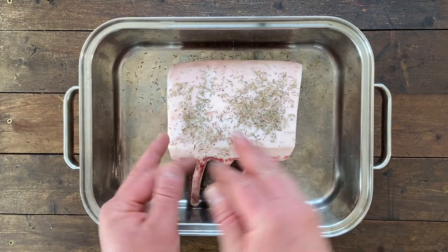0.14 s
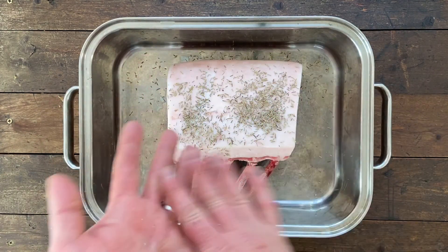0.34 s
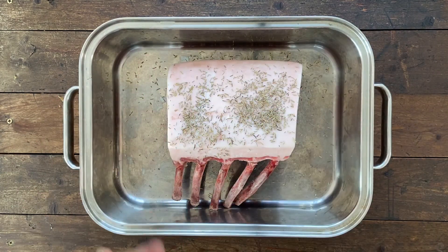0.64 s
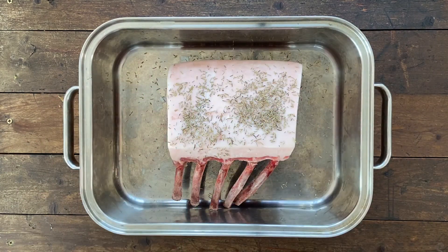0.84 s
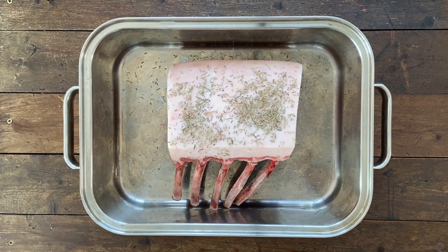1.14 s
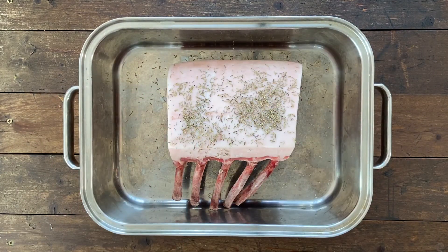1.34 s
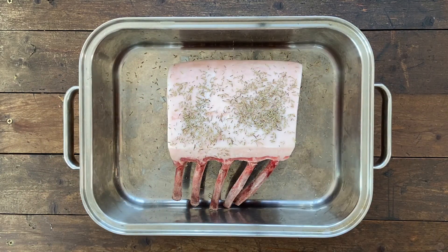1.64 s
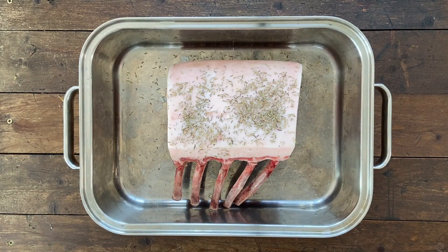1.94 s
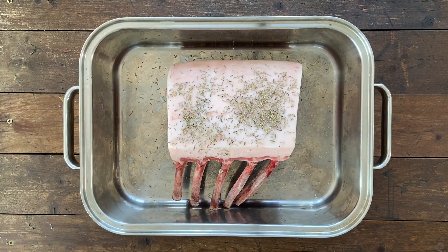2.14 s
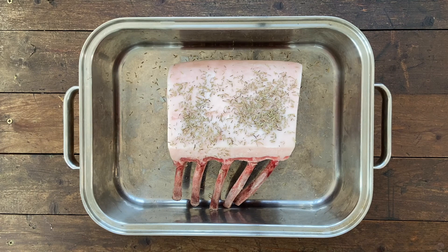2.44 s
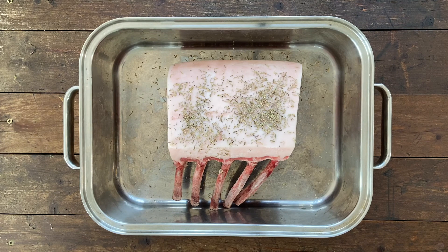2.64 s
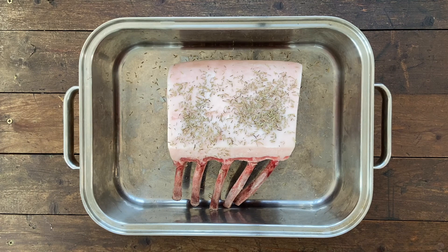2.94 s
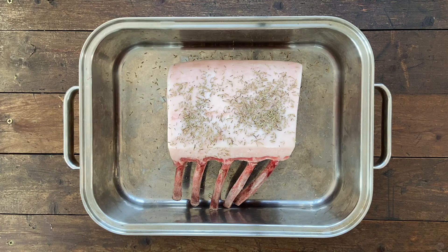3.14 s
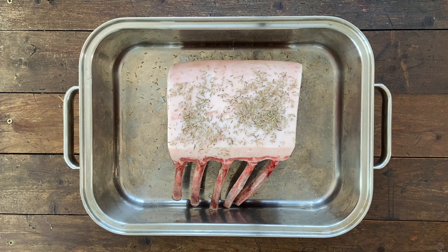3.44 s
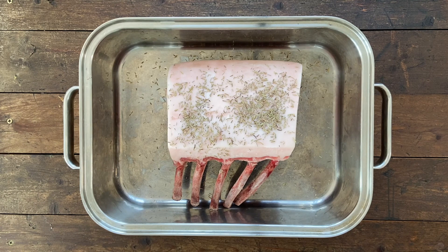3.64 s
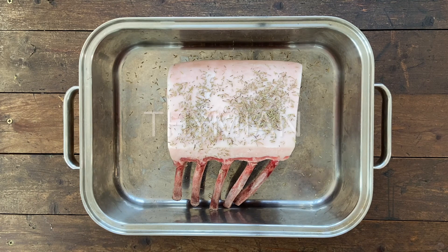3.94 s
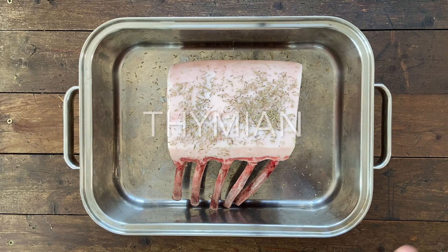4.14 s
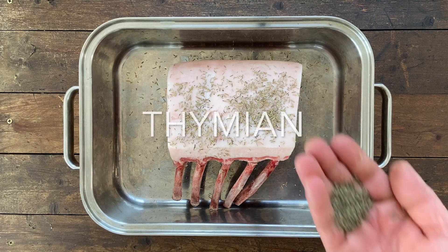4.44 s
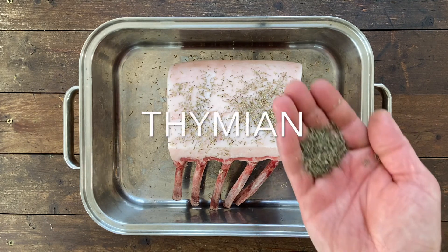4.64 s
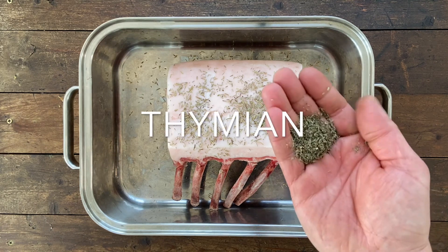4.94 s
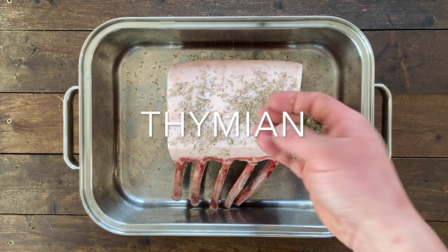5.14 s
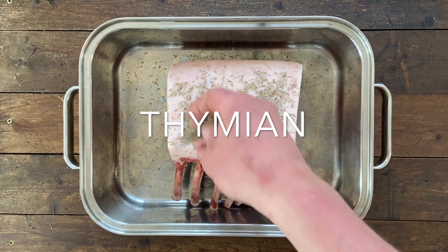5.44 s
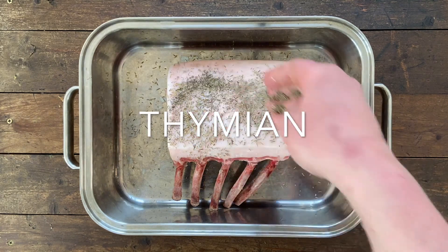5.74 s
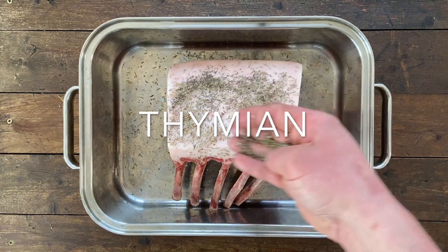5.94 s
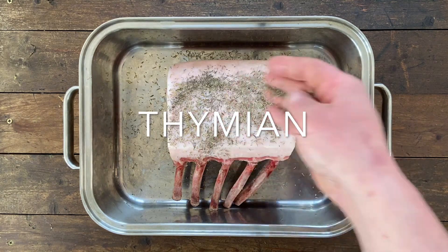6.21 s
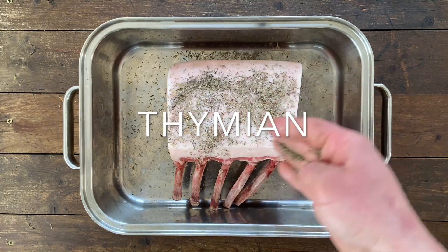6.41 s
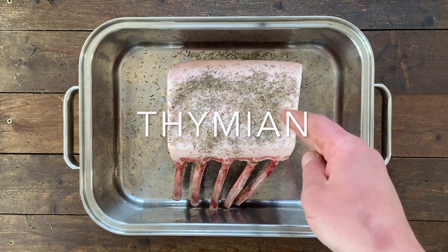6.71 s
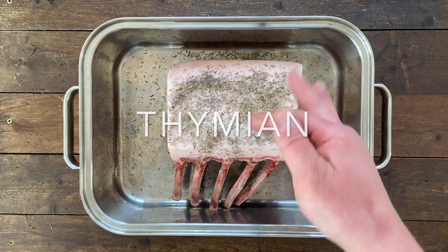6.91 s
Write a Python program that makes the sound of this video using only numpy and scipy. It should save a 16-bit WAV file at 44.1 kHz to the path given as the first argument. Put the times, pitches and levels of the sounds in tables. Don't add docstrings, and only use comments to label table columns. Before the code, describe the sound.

Dry herbs rustle between palms, a wooden drawer rolls and whines, a glass jar clinks down, its lid snaps, then more herbs are sprinkled.

```python
import sys
import numpy as np
from scipy import signal
from scipy.fft import rfft, irfft, next_fast_len
from scipy.io import wavfile
from scipy.ndimage import uniform_filter1d

SR = 44100
rng = np.random.default_rng(int(sys.argv[2]) if len(sys.argv) > 2 else 0)


def level_to_linear(level):
    exponent = np.asarray(level, float) / 20
    return 10 ** exponent


def generate_wav(signal):
    frames = np.transpose(np.atleast_2d(signal))
    scaled = np.clip(frames, -1, 1) * 32767
    pcm = np.round(scaled).astype(np.int16)
    wavfile.write(sys.argv[1], SR, pcm)


N = 311787
SIZE = next_fast_len(N + SR)
HZ = np.linspace(0, 1, SIZE // 2 + 1) * SR / 2
TIME = np.arange(N) / SR


def on_hz(table):
    hz, value = np.transpose(table)
    return np.interp(np.log(HZ + 1), np.log(hz + 1), value)


def shape(x, gain):
    return irfft(rfft(x, SIZE) * gain, SIZE)[..., :N]


def unit(x):
    return x / np.sqrt(np.mean(x ** 2))


def bell(hz, octaves):
    return np.exp(-.5 * (np.log2((HZ + 1) / hz) / octaves) ** 2)


def walk(rate_hz):
    hold = int(SR / rate_hz)
    steps = np.repeat(rng.standard_normal(N // hold + 1), hold)
    smooth = uniform_filter1d(uniform_filter1d(steps, hold), hold)
    return unit(smooth[:N])


def grit(share, spread_db):
    size_db = spread_db * np.minimum(rng.exponential(size=N), 3)
    clicks = (rng.random(N) < share) * level_to_linear(size_db)
    return unit(rng.standard_normal(N) * (1 + clicks))


def strokes(rows, rise_db_s, fall_db_s, tail_db, tail_db_s):
    power = np.zeros((2, N))
    for start_s, length_s, db, colour_db in rows:
        at = slice(max(int((start_s - .2) * SR), 0), int((start_s + length_s + 1) * SR))
        before = (start_s - TIME[at]).clip(0)
        after = (TIME[at] - start_s - length_s).clip(0)
        fall = level_to_linear(-2 * fall_db_s * after) + level_to_linear(2 * (tail_db - tail_db_s * after))
        stroke = level_to_linear(2 * (db - rise_db_s * before)) * fall
        power[:, at] += stroke * np.array([[1], [level_to_linear(2 * colour_db)]])
    return np.sqrt(power)


def strikes(times, db):
    x = np.zeros(N)
    x[(np.asarray(times) * SR).astype(int)] = level_to_linear(np.asarray(db))
    return x


def struck(blows, body):
    return shape(blows, rfft(body, SIZE))


def ring(modes, shorten):
    t, total = TIME[:SR], 0
    for k, (hz, db, t60_s) in enumerate(modes):
        fade = 1000. ** (-t / (shorten * t60_s))
        total = total + (-1) ** k * level_to_linear(db) * np.sin(2 * np.pi * hz * t) * fade
    return total


def crack(times, db, colour, fade_s):
    gain = level_to_linear(on_hz(colour))
    puffs = signal.lfilter([1], [1, -np.exp(-1 / (fade_s * SR))], strikes(times, db))
    return shape(puffs * rng.standard_normal(N), gain / np.sqrt(np.mean(gain ** 2)))


def dull_rings(rows):
    out, t = np.zeros(N), TIME[:SR // 8]
    contact_cycles = 0.55
    for start_s, db, hz, cycles in rows:
        start = int(start_s * SR)
        fade = np.exp(-2 * hz * t / cycles) * (1 - np.exp(-hz * t / contact_cycles))
        out[start:start + len(t)] += level_to_linear(db) * np.sin(2 * np.pi * hz * t) * fade
    return out


# f/Hz, level/dB per Hz
LEAF_COLOUR = [(400, -28.5), (800, -18.5), (2000, -3), (4500, -3), (7000, -2.5), (9000, -1.5), (11400, 1),
               (13500, 1), (16000, 0.5)]
# t/s, length/s, treble
# level/dB, middle minus treble/dB
LEAF_RUBS = [(0, 0.035, -71.5, 0), (.075, 0.006, -70, -5), (.22, 0.031, -62.5, -5),
             (.24, 0.037, -56.5, 0.5), (.495, 0.078, -81.5, 9.5), (.62, 0.038, -78.5, 3),
             (.74, 0.39, -98.5, 20), (1.09, 0.086, -88, 11), (3.77, 0.091, -84.5, 17.5),
             (3.87, 0.038, -77, 15.5), (3.94, 0.032, -69, -1), (4.185, 0.22, -87.5, 1),
             (5.265, 0.074, -74.5, 1), (5.36, 0.076, -72.5, 4), (5.47, 0.31, -71, -0.5),
             (5.83, .05, -76.5, 17), (5.9, 0.057, -65, 6.5), (6.1, 0.16, -84.5, -11),
             (6.26, 0.042, -72, -0.5), (6.33, 0.076, -75.5, 3), (6.47, 0.035, -78.5, -8),
             (6.55, 0.057, -75, -5), (6.65, 0.025, -80, -4), (6.75, 0.015, -74.5, -2.5),
             (6.81, 0.038, -75.5, -12), (6.97, 0.019, -78.5, -3.5), (7.03, 0.019, -67, -3.5),
             (1.22, 0.031, -95.5, 3), (1.434, .03, -92.5, 17), (1.84, 0.1, -91, 11),
                  (1.975, 0.055, -86.5, 7), (2.24, 0.099, -100, 2), (2.6, .03, -101, -2),
                  (2.738, .05, -89.5, 13), (2.88, 0.036, -83.5, -12.5), (3.104, 0.024, -93.5, -8),
                  (5.057, 0.075, -91, 8)]


def hands():
    treble_gain, middle_gain = strokes(LEAF_RUBS, rise_db_s=900, fall_db_s=328,
                                       tail_db=-14, tail_db_s=43)
    leaves = shape(np.array([grit(0.036, 3.4), grit(0.038, 8.5)]), level_to_linear(on_hz(LEAF_COLOUR)))
    leaves = leaves / np.std(shape(leaves[0], (HZ > 9000) & (HZ < 11500)))
    middle = shape(leaves, 1 / (1 + (HZ / 6000) ** 6))
    return level_to_linear(0.39 * walk(40)) * (treble_gain * (leaves - middle) + middle_gain * middle)


# t/s, peak level/dB
LEAF_TICKS = [(.2273, -46), (0.247, -37), (.495, -71), (5.263, -63), (6.547, -63), (6.807, -65),
              (7.035, -58), (6.262, -48.5), (6.75, -62), (6.986, -62)]


def leaf_ticks():
    return crack(*np.transpose(LEAF_TICKS), [(1000, -20), (3300, -6), (6000, -2), (16000, -4)], fade_s=.0007)


# t/s, peak level/dB, ring level/dB, thud level/dB
JAR_TOUCHES = [
    (3.402, -28.5, -52, -20),
    (3.4226, -29, -38.5, -19.5),
    (3.4175, -23.5, -36.5, -26.5),
    (3.438, -26.5, -37.5, -15.5),
    (3.448, -19, 11.5, -27),
    (3.466, -26, -22.5, -16.5),
    (3.482, -29, -24.5, -18.5),
    (3.492, -31, -18.5, -20.5),
    (3.533, -41.5, -19.5, -20.5),
]
# f/Hz, level/dB per Hz
JAR_CRACK = [(60, -9), (120, -5), (250, -4.5), (400, -1.5), (1000, -3), (1800, -2), (2800, -6.5),
             (4500, -15.5), (8000, -28.5), (16000, -49)]
# f/Hz, level/dB, t60/s
BOARD_MODES = [(113, -7, 0.59), (385.7, -7.5, 0.39), (490, -12, 0.8), (770, 0.5, 0.58), (1219, -5.5, 0.44),
               (1530, 0.5, 0.3), (1610, -2, 0.25), (1850, -12.5, 0.3), (1990, -21.5, 0.3), (2730, 2, 0.23),
               (2750, -14.5, 0.92), (3060, -17.5, 0.46)]
# f/Hz, level/dB, t60/s
GLASS_MODES = [(5414, -5, .48), (5492, -3.5, .64), (5503, -11, .5), (6002, -20, .09), (8366, -17, .05),
               (9367, -9, .56), (9376, -16, .5), (10162, -12.5, .4), (10176, -19, .36), (10930, -14, .05),
               (11715, -7, .2), (11742, -13, .36), (12318, -5, .3), (15390, -29, .22)]
# f/Hz, level/dB, t60/s
WORKTOP_MODES = [(114.4, -6.5, 0.46), (399, -3, 0.43), (505, -10.5, 0.37), (732, 0, 0.19),
                 (1238, -9.5, 0.43), (1450, -8.5, 0.24), (1766, -8, 0.33), (1845, -3.5, 0.29),
                 (1940, -10.5, 0.45), (2503, 0, 0.18), (2900, -14.5, 0.44), (2988, -17, 0.35),
                 (3150, -18.5, 0.46), (3600, -15.5, 0.33)]


def jar():
    s, db, ring_db, thud_db = np.transpose(JAR_TOUCHES)
    thud = ring([(127.0, -1.0, 0.47), (258, -7.0, 0.12), (386.0, -3.5, 0.066)], 0.93)
    board = crack(s, db - 0.5, JAR_CRACK, fade_s=0.0029)
    board += struck(strikes(s, db - 22.5), ring(BOARD_MODES, 0.063))
    board += struck(strikes(s, db + thud_db), thud)
    tick_colour = [(800, -16), (2000, 0), (5000, -3), (12000, -7), (16000, -18)]
    tick = crack(s, db + ring_db - 10, tick_colour, fade_s=.002)
    t = TIME[:SR]
    swell = (1 - np.exp(-t / .002)) * (1 - .6 * np.exp(-t / .045))
    worktop = level_to_linear(-16.5) * ring(WORKTOP_MODES, 0.8) * (1 - np.exp(-t / .015))
    body = ring(GLASS_MODES, 0.71) * swell + worktop
    return board, struck(strikes(s, db + ring_db - 11.0), body), tick


# t/s, peak level/dB, treble level/dB
LID_SNAPS = [
    (4.812, -39.5, -20),
    (4.825, -40.5, -10),
    (4.837, -30.5, -11),
    (4.875, -36.5, -14),
    (5.69, -34.5, -25),
    (5.699, -37.5, -20),
    (5.711, -28, -5.5),
    (5.749, -38, -0.5),
]
# f/Hz, level/dB per Hz
LID_CRACK = [(60, -30), (150, -14), (400, -9), (650, -7), (1010, -0.5), (1450, -1.5), (2300, -12.5),
             (4000, -14.5), (6500, -20), (10000, -27), (16000, -43)]
# f/Hz, level/dB, t60/s
LID_MODES = [(593, 3.5, 0.33), (689, -8, 0.17), (857, -19, 0.25), (1019, 6, 0.37), (1190, -1, 0.39),
             (1374, -11, 0.49), (1690, 0, 0.36), (2050, -16, 0.306), (2520, -24, 0.24), (2690, -2, 0.27),
             (3500, -17, 0.14), (4100, -10, 0.2), (5370, -32, .3)]
# f/Hz, level/dB
OFF_TINT = [(300, 0.5), (700, 1.5), (1000, 0), (1300, 2), (1700, -2), (2500, 0.1), (4100, 0.5)]
# f/Hz, level/dB
ON_TINT = [(300, 1.7), (600, 2), (1000, 2), (1300, -2), (1700, -1.5), (2050, -3), (2500, 1.3), (4100, 1.2)]


def lid():
    s, db, treble_db = np.transpose(LID_SNAPS)
    snap = crack(s, db + 0.5, LID_CRACK, fade_s=0.0096)
    snap = snap + struck(strikes(s, db - 20.0), ring(LID_MODES, 0.68))
    going_on = TIME >= 5.3
    coming_off = shape(snap * ~going_on, level_to_linear(on_hz(OFF_TINT)))
    snap = coming_off + shape(snap * going_on, level_to_linear(on_hz(ON_TINT)))
    treble_colour = [(2000, -27), (4000, 7.0), (6000, 27), (12000, -33.0)]
    return snap + crack(s, db + treble_db, treble_colour, fade_s=0.0042)


# t/s, level/dB
OFF_BLOWS = [
    (4.814, -54),
    (4.838, -47.5),
    (4.873, -53.5),
]
# t/s, level/dB
ON_BLOWS = [
    (5.692, -42),
    (5.712, -38),
    (5.749, -43),
]
# f/Hz, level/dB, t60/s
CAP_OFF_MODES = [(691, 0, 0.44), (760, -6, .3), (850, -10, 0.45), (1012, 2.5, 0.6), (1150, -7, 0.55),
                 (1270, -10, 0.53), (1370, -2.5, 0.98), (1480, -6, 0.55), (1530, -4, .6), (1620, -9, 0.5),
                 (2000, -3, 0.68), (2900, -12, .3), (3332, -16, .4), (4059, -7, 0.85)]
# f/Hz, level/dB, t60/s
CAP_ON_MODES = [(588, -6, 0.4), (680, -11, 0.45), (750, -18, .4), (816, -9, .5), (985, -1, 0.53),
                (1030, -3, 0.45), (1165, -8, 0.6), (1615, -7, .6), (1998, -8.5, 0.69), (2500, -16, .4),
                (3170, -3.5, 0.14), (3741, -21, .5)]
# f/Hz, level/dB, t60/s
CAP_AIR = [(1030, 10, 0.046), (1960, -5.5, 0.048)]


def cap():
    pop = ring(CAP_AIR, 1.2)
    off = ring(CAP_OFF_MODES, 0.65) + level_to_linear(-12) * pop
    on = ring(CAP_ON_MODES, 0.65) + level_to_linear(-7) * pop
    return struck(strikes(*np.transpose(OFF_BLOWS)), off) + struck(strikes(*np.transpose(ON_BLOWS)), on)


# t/s, peak level/dB, centre f/Hz, ring/cycles
NEAR_KNOCKS = [(1.091, -46.5, 520, 4.5), (1.178, -47, 1600, 6.5), (1.2, -47, 1480, 5), (1.53, -54, 800, 4),
               (2.042, -54, 900, 3.4), (3.402, -29, 2100, 6), (3.417, -29.5, 2520, 14),
               (3.418, -22.5, 1620, 9.8), (3.438, -30, 1900, 7), (3.448, -22, 2520, 7),
               (3.450, -20.5, 1520, 6.5), (3.403, -34, 1400, 6), (3.455, -32.5, 732, 48),
               (3.47, -35.5, 280.7, 12), (3.505, -33, 490, 11), (3.476, -34, 3924, 220),
               (3.482, -26.5, 1550, 9), (3.532, -27, 2900, 7), (3.558, -43, 4040, 150),
               (3.628, -47, 3950, 120), (4.166, -51.5, 1150, 5), (4.836, -25, 1030, 9.2),
               (4.874, -28, 1000, 6.5), (4.89, -39, 1370, 30), (5.711, -25.5, 1030, 8.5),
               (5.714, -31.5, 985, 45), (5.749, -29, 1030, 8)]


def near_knocks():
    return dull_rings(NEAR_KNOCKS)


# t/s, peak level/dB, centre f/Hz, ring/cycles
WOOD_BUMPS = [(0.41, -54, 217, 1.6), (0.692, -39.5, 199, 1.6), (0.699, -58, 373, 17),
              (1.069, -43.5, 116, 6.1), (1.091, -42, 600, 1.5), (1.111, -43.5, 413, 9.5),
              (1.178, -48, 1400, 1.3), (1.198, -37, 1310, 1.8), (1.41, -49, 396, 14),
              (1.53, -54, 900, 0.92), (1.645, -40.5, 425, 2.7), (2.0, -48.5, 438, 7.3),
              (2.041, -37, 1030, 0.52), (2.04, -65, 400, 8.4), (2.202, -41.5, 1210, 2),
              (2.27, -52.5, 392.4, 18), (2.32, -63, 396, 9.5), (3.79, -51, 110, 5.9),
              (4.166, -52, 1180, 4.3), (4.18, -49.5, 1154, 16), (6.71, -67.5, 776, 30),
              (4.185, -41, 2152, 3), (4.215, -45, 1900, 2.9), (4.25, -53, 2290, 4), (4.232, -50, 1205, 13),
              (4.257, -57, 1190, 14), (4.243, -69, 2860, 42), (4.35, -60, 760, 17), (4.19, -48.5, 807, 9.1),
              (4.743, -72, 1486, 1.14), (5.62, -53, 2300, 28), (6.93, -65.5, 1390, 21)]


def wood_bumps():
    return dull_rings(WOOD_BUMPS)


# t/s, length/s, level/dB, brightness/dB
DRAWER_PUSHES = [(.38, 0.045, -73.5, 1.5), (.7, 0.12, -85, 8.5), (1.09, 0.049, -57.5, -14.5),
                 (1.19, 0.13, -55, -13), (1.38, 0.15, -61, -20.5), (1.65, 0.051, -59.5, -26),
                 (1.83, 0.056, -67, -12.5), (2.01, 0.066, -61.5, -14), (2.23, 0.1, -65.5, -6),
                 (2.47, .02, -82.5, 3.5), (2.56, 0.018, -83, -0.5), (2.72, 0.12, -76.5, -4),
                 (3.19, 0.24, -75, -23), (3.78, 0.06, -62, -10), (3.85, .12, -58, -8.5),
                 (4.17, 0.12, -67, -1.5), (4.3, 0.035, -71.5, -8), (4.745, 0.076, -71.5, 2),
                 (5.2, 0.021, -72.5, -3), (5.28, 0.17, -71, -1), (5.59, .03, -69.5, -4),
                 (5.635, 0.088, -65.5, 7)]


def drawer():
    gain, bright_gain = strokes(DRAWER_PUSHES, rise_db_s=509, fall_db_s=93.5, tail_db=-17.5, tail_db_s=57)
    rough = np.array([grit(0.0025, 4.5), grit(0.0045, 6.5)])
    hollow = unit(shape(rough, bell(330, 0.94) + 0.13 * bell(360, 0.036)))
    bright = unit(shape(rough, bell(1390, 1.0)))
    return level_to_linear(0.45 * walk(60)) * (gain * hollow + bright_gain * bright)


# t/s, length/s, level/dB, octave minus level/dB
WHINES = [(1.81, 0.025, -61, -12.5), (2.05, 0.06, -63, -19), (2.14, 0.033, -58.5, -14),
          (2.22, 0.21, -60.5, -14), (2.39, 0.18, -58.5, -14.5), (2.7, 0.12, -59, -14.5),
          (2.83, 0.13, -62, -5), (3.23, 0.079, -70, -13), (3.34, 0.043, -69.5, -13)]
# t/s, f/Hz
WHINE_PITCH = [(1.8, 551), (2.05, 568), (2.12, 604), (2.17, 579), (2.25, 574.5), (2.6, 574.2), (2.68, 543),
               (2.88, 557), (3.2, 549), (3.32, 521), (3.39, 522)]
# t/s, length/s, level/dB
SQUEALS = [
    (2.874, 0.067, -69.5),
    (3.072, .12, -74),
    (3.28, .1, -79.5),
]


def runner():
    rise_db_s, fall_db_s = 299.5, 171
    gain, octave_gain = strokes(WHINES, rise_db_s, fall_db_s, -24, 80)
    waver = 1 + .008 * walk(25) + .02 * walk(90)
    turn = 2 * np.pi * np.cumsum(np.interp(TIME, *np.transpose(WHINE_PITCH)) * waver) / SR
    whine = gain * level_to_linear(2.3 * walk(30)) * np.sin(turn)
    whine = whine + octave_gain * level_to_linear(2.3 * walk(34)) * np.sin(2 * turn)
    squeal_hz = 1232 - 110 * (TIME - SQUEALS[0][0])
    squeal_gain = strokes([(*row, 0) for row in SQUEALS], rise_db_s, fall_db_s, -9.5, 40)[0]
    squeal_turn = 2 * np.pi * np.cumsum(squeal_hz * (1 + 0.0015 * walk(33))) / SR
    return whine + squeal_gain * np.sin(squeal_turn)


# t/s, length/s, first f/Hz, level/dB, fall/share of pitch
CHIRPS = [(0.036, 0.05, 4150, -70, 0.18), (.037, 0.027, 3400, -75, 0.093),
          (0.119, 0.045, 4140, -71.5, 0.23), (0.144, 0.04, 2730, -75.5, 0.043),
          (0.329, 0.039, 3904, -61.5, 0.085), (0.37, 0.084, 3700, -88, 0.018),
          (0.357, 0.085, 2620, -72.5, -0.12), (0.447, 0.029, 3330, -69.5, 0.12),
          (0.532, 0.029, 3910, -70, -0.027), (0.553, 0.043, 3500, -69.5, 0.023),
          (.61, 0.066, 3390, -86, -0.11), (0.675, 0.035, 2450, -76, 0.084), (0.69, 0.031, 3370, -71.5, .07),
          (0.891, .03, 4600, -76, 0.0064), (0.9, 0.071, 4030, -80, 0.1), (0.9, 0.06, 3320, -70.5, 0.077),
          (1.072, 0.085, 4480, -77, 0.23), (2.23, 0.045, 3040, -85, 0.11), (2.51, 0.09, 3494, -80.5, 0.089)]
# t/s, length/s, first f/Hz, level/dB, fall/share of
WHISTLES = [(0.578, 0.14, 2750, -72.5, 0.026), (0.694, 0.059, 2810, -69, 0.032),
            (0.922, 0.13, 2790, -70.5, 0.04), (1.085, 0.06, 9080, -66.5, -0.0047),
            (2.292, 0.15, 4204, -62, 0.0067), (2.529, 0.14, 4064, -61.5, 0.011),
            (3.829, 0.093, 2115, -63, -0.072)]


def birds():
    out, warble, grain = np.zeros(N), walk(150), walk(500)
    notes = [(*row, .027) for row in CHIRPS]
    notes += [(*row, 30 / row[2]) for row in WHISTLES]
    for start_s, length_s, first_hz, db, fall, share in notes:
        at = slice(int(start_s * SR), int((start_s + length_s) * SR))
        part = (TIME[at] - start_s).clip(0) / length_s
        hz = first_hz * (1 - fall * part) * (1 + share * warble[at])
        tone = (1 + 70 * share * grain[at]) * np.sin(2 * np.pi * np.cumsum(hz) / SR)
        out[at] += level_to_linear(db) * np.sin(np.pi * part ** 0.55) ** .5 * tone
    return out


# f/Hz, level/dB per Hz
HOUSE_COLOUR = [(18, -41), (31, -21), (45, 2.5), (62, -1.5), (90, -8.5), (156, -16.5), (480, -25),
                (1100, -29), (1700, -36), (5000, -45), (9000, -47.5), (13000, -52.5), (16000, -55)]


def house():
    air = shape(rng.standard_normal((2, N)), level_to_linear(on_hz(HOUSE_COLOUR)))
    low = shape(air, 1 / (1 + (HZ / 110) ** 4))
    swell = level_to_linear(0.83 * walk(7.7) + 0.5)
    return level_to_linear(-64.5) * (air + low * (swell - 1)) / np.std(air)


# f/Hz, t60/s
ROOM_DECAY = [(60, 1), (400, 0.83), (1500, 0.81), (4000, 0.62), (10000, 0.39)]


def room(far, near, far_db):
    t, tails = TIME[:SR], 0
    decay_hz, decay_s = np.transpose(ROOM_DECAY)
    for hz in 60 * 2. ** np.arange(9):
        t60_s = np.interp(np.log(hz), np.log(decay_hz), decay_s)
        band = np.exp(-.5 * (np.log2(np.arange(1, SR // 2 + 2) / hz) / .45) ** 2)
        tails = tails + irfft(rfft(rng.standard_normal((2, SR))) * band) * 1000. ** (-t / t60_s)
    tails = tails * (1 - np.exp(-t / 0.0015))
    tails = tails / np.sqrt(np.sum(tails ** 2, axis=1, keepdims=True))
    wet = struck(far + level_to_linear(-5.5) * near, tails)
    wet[0] += level_to_linear(far_db) * far
    return wet


# f/Hz, share/dB
PORTS_APART = [(60, -29), (130, -21), (300, -14), (480, -10), (750, -2), (1400, -2), (3000, -5),
               (6000, -11), (15000, -12)]
# f/Hz, lead/radians
PORT_LEAD = [(0, 0), (1400, .3), (2750, .9), (5600, .85), (6200, 1.95), (7350, 3.14), (10450, 6.28),
             (13500, 9.42), (16200, 12.2)]
# f/Hz, left minus right/dB
PORT_BALANCE = [(60, -.3), (110, -.5), (200, -1), (380, -1.1), (700, -1.3), (1290, -.7), (2380, -.7),
                (4400, -.3), (8120, 0), (15000, 0)]


def microphone_ports(common, other):
    other = shape(-other, level_to_linear(on_hz(PORTS_APART)))
    lead = np.interp(HZ, *np.transpose(PORT_LEAD))
    turn = np.exp(.5j * lead) * level_to_linear(on_hz(PORT_BALANCE) / 2)
    return np.array([shape(common + other, turn), shape(common - other, 1 / turn)])


def scene():
    board, glass, glass_tick = jar()
    song, cover, whine, bumps = birds(), lid(), runner(), wood_bumps()
    near = glass + cap()
    far = board + cover + level_to_linear(-8) * whine + bumps + level_to_linear(-3) * song
    common, other = room(far, near, far_db=-7.0) + drawer() + hands() + house()
    common = common + glass_tick + leaf_ticks() + near_knocks()
    common = common + level_to_linear(-4) * song + level_to_linear(-21) * bumps + level_to_linear(-1.5) * whine
    common = common + level_to_linear(0.9 + 2.1 * walk(70)) * near
    return microphone_ports(common, other)


def roll_off(x):
    return signal.sosfilt(signal.butter(12, 16620, fs=SR, output="sos"), x)


def record(dry):
    mix = shape(dry, 1 / (1 + (HZ / 15720) ** 160))
    return roll_off(mix)


dry = scene()
out = record(dry)
generate_wav(out)
```